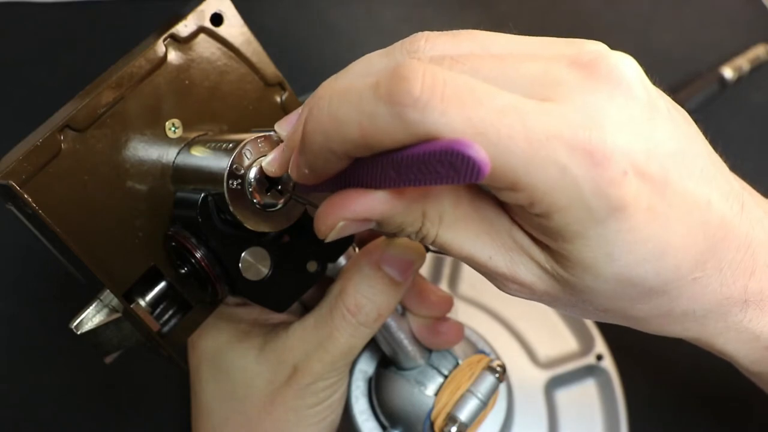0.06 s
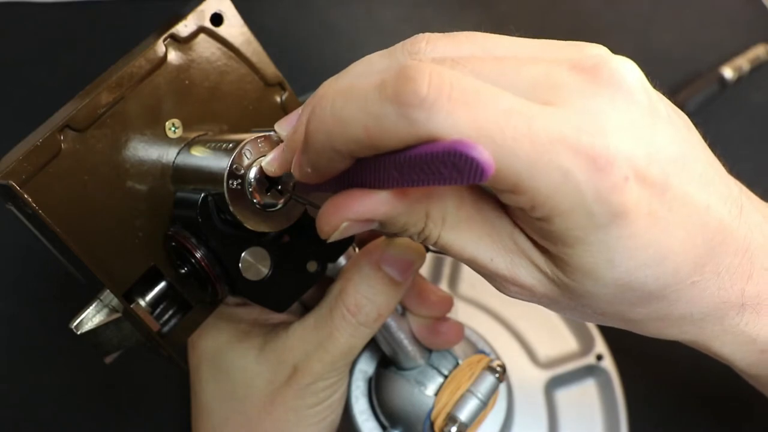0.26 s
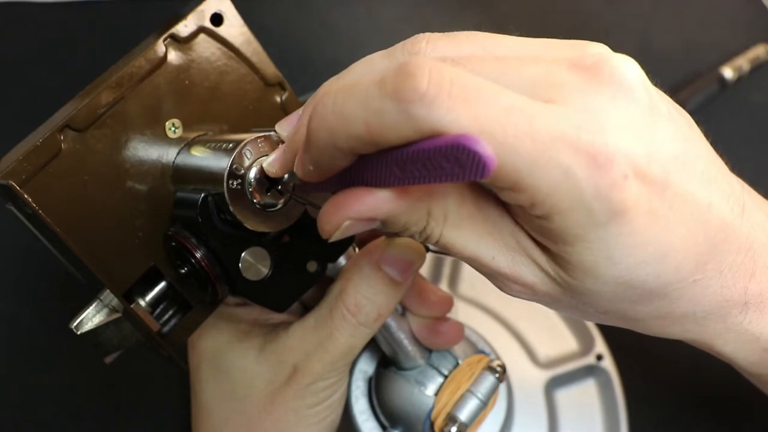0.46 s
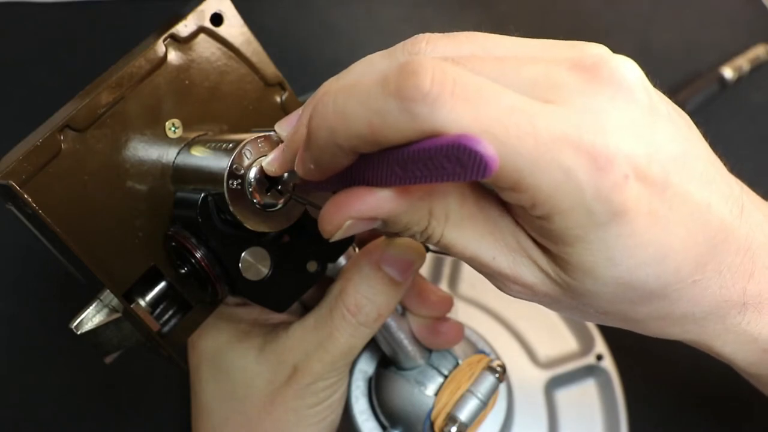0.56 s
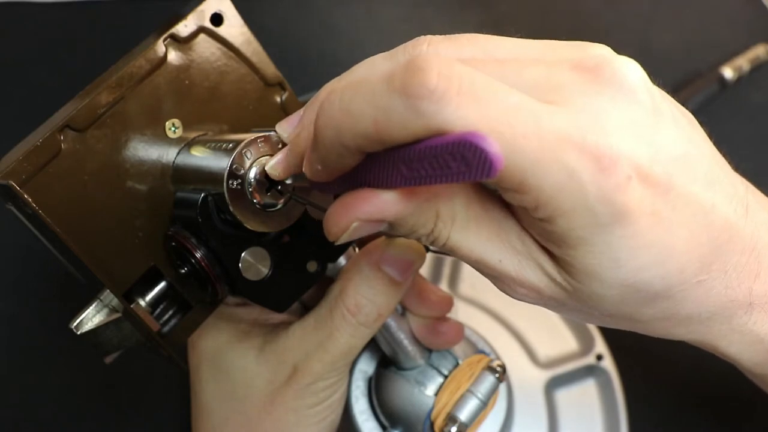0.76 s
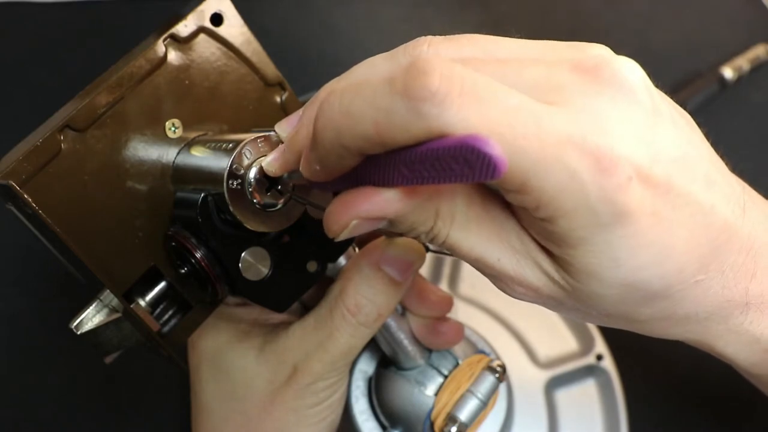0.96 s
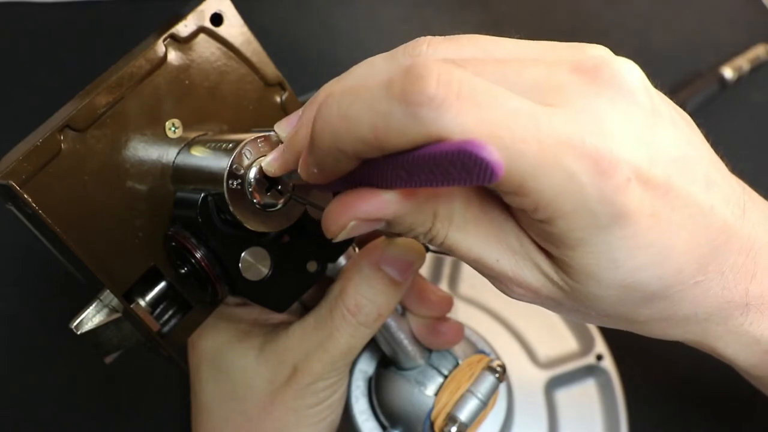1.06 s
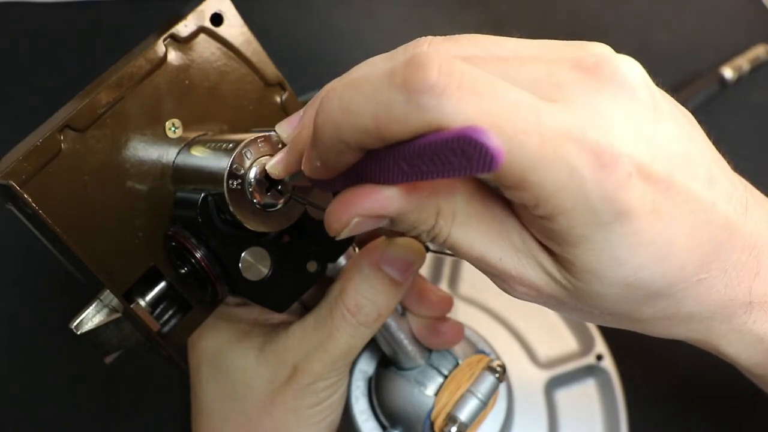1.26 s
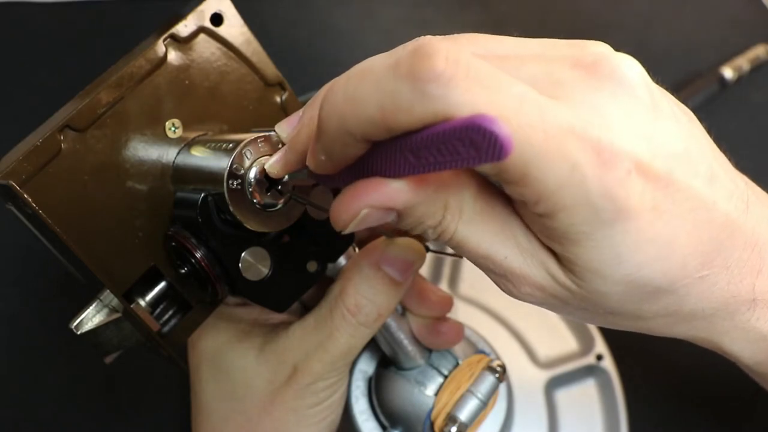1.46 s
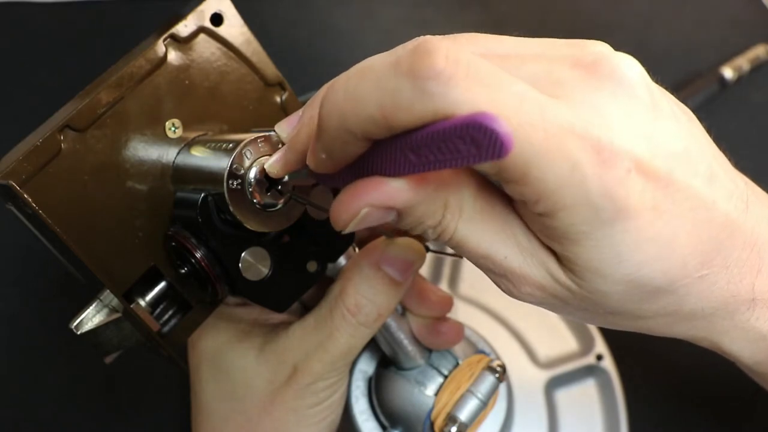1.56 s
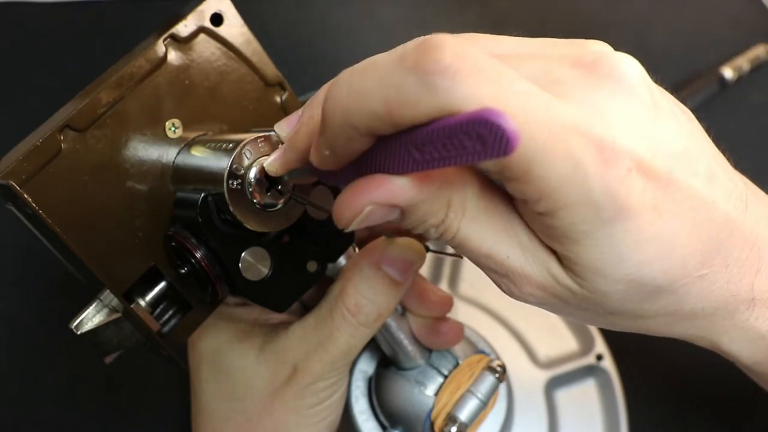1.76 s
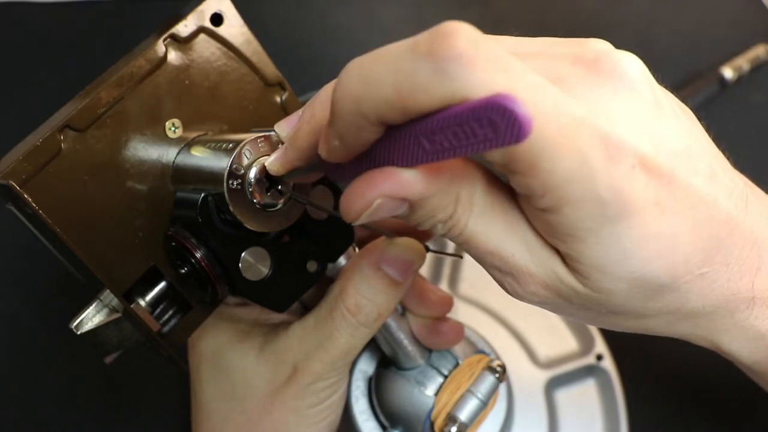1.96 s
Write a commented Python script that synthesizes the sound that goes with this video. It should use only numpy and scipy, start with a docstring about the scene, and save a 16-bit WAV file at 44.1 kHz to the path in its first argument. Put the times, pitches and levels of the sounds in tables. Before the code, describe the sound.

A steel pick works in a lock cylinder, with faint irregular ticks and short scrapes for about a second, then a sharp metallic click and a few last tiny ticks, close microphone, quiet small room.

```python
"""Quiet room noise and mains hum, then a faint rising squeak as a thin steel pick enters a lock held in a vice.
The tip scrapes and ticks over the pins: noise bursts and modal sines, coloured by the point of contact.
The hand bumps softly (low noise) and the lock knocks dully in its grip (two damped sines).
A bound pin lets go with a sharp click of five blows, the hardest ringing the lock. A short room tail follows."""
import sys
import numpy as np
from scipy import signal
from scipy.fft import rfft, irfft, next_fast_len
from scipy.io import wavfile

SR = 44100
rng = np.random.default_rng(int(sys.argv[2]) if len(sys.argv) > 2 else 0)


def unload_audio(sound):
    """Save the sound as a 16-bit wav file, at the path given as the first command line argument."""
    columns = np.transpose(np.atleast_2d(sound))
    # keep every value between -1 and 1, then stretch to whole-number steps
    steps = np.round(np.clip(columns, -1, 1) * 32767)
    wavfile.write(sys.argv[1], SR, steps.astype(np.int16))


N = 88596


def amp(db):
    """Decibels to gain."""
    return 10 ** (np.asarray(db) / 20)


def unit(x):
    """Scale to rms 1."""
    return x / np.sqrt(np.mean(x ** 2) + 1e-20)


def along(points, hz):
    """Interpolate (Hz, value) points on a log-frequency axis."""
    point_hz, value = np.transpose(points)
    return np.interp(np.log(hz + 1), np.log(point_hz + 1), value)


def filtered(x, response):
    """Multiply the spectrum of x by a response of frequency in Hz."""
    size = next_fast_len(len(x) + 8192)
    spectrum = rfft(x, size) * response(np.fft.rfftfreq(size, 1 / SR))
    return irfft(spectrum, size)[:len(x)]


def noise(colour, size):
    """Noise of rms 1 with the given spectral shape."""
    return unit(filtered(rng.standard_normal(size), lambda hz: amp(along(colour, hz))))


def add(track, start_s, sound):
    """Mix a sound into the track, cut at the track's end."""
    part = track[round(start_s * SR):][:len(sound)]
    part += sound[:len(part)]


def swell(t, length_s):
    """Half-sine rise and fall."""
    return abs(np.sin(np.pi * np.clip(t / length_s, 0, 1)))


def background():
    """Steady coloured room noise and hiss, plus sines at the mains lines."""
    # room noise spectrum: freq_hz, density_db (relative, per Hz)
    air_colour = [(3, -57), (15, 1.5), (29, -11.5), (48, -16), (73, -7.5), (100, -2.5), (140, -3.5),
                  (205, 0), (260, -9.5), (400, -6), (730, -10.5), (1120, -12), (2770, -15.5), (4200, -20.5),
                  (8400, -20.5), (14000, -24.5), (16000, -28.5)]
    # mains lines: freq_hz, rms_level_db
    hum_lines = [(59.8, -64.5), (120, -88.5), (179.8, -70), (240, -74.5), (297, -75)]
    air_rms_db = -58.5
    t = np.arange(N) / SR
    hum = np.zeros(N)
    for hz, db in hum_lines:
        hum += amp(db) * np.sqrt(2) * np.sin(2 * np.pi * (hz * t + rng.random()))
    return amp(air_rms_db) * noise(air_colour, N) + hum


def squeak():
    """Stick-slip of the tip: a swelling sine of rising, jittered frequency."""
    start_s, length_s, peak_db = .075, .07, -63.5
    start_hz, rise_hz_per_s, jitter_hz = 1673, 2900, 700
    out, t = np.zeros(N), np.arange(SR // 10) / SR
    pitch_hz = start_hz + rise_hz_per_s * t + jitter_hz * rng.standard_normal(len(t))
    cycles = np.cumsum(pitch_hz) / SR
    add(out, start_s, amp(peak_db) * swell(t, length_s) * np.sin(2 * np.pi * cycles))
    return out


def clatter(t60_s):
    """Dense short-lived modes as noise: an instant crack, a burst and a faint after-ring in the vice."""
    # dense mode spectrum: freq_hz, density_db (relative, per Hz)
    mode_colour = [(40, -70), (200, -32), (420, -6), (950, -7.5), (1350, -1.5), (1750, -6), (2500, 2),
                   (3000, -2), (3700, -5.5), (4400, 0.5), (5500, -8), (7200, 0.5), (8500, -1.5), (10300, 5),
                   (12300, 1), (14300, 4), (15300, -11), (16000, -13)]
    crack_t60_s, crack_db = 0.00056, -7.5
    after_t60_s, after_db = 0.087, -21.5
    t = np.arange(SR // 4) / SR
    burst = amp(-60 * t / t60_s) + amp(crack_db - 60 * t / crack_t60_s)
    after_ring = amp(after_db - 60 * t / after_t60_s)
    return noise(mode_colour, len(t)) * np.hypot(burst, after_ring)


def ring():
    """Distinct modes of lock and pick: damped sines of random phase."""
    # modes of lock and pick: freq_hz
    modes_hz = [641, 1328, 2106, 2424, 2510, 3319, 4610, 6172, 7164, 7400, 7833, 8600, 9518, 10430]
    # the same modes in order: level_db (relative), t60_s
    mode_decays = [(-8.5, 0.16), (-2, 0.038), (-3.5, 0.082), (1, 0.069), (0, 0.048), (-4.5, 0.083),
                   (-1, 0.047), (4.5, 0.044), (7.5, 0.032), (-6, 0.044), (-1.5, .055), (-2, 0.035),
                   (11, 0.021), (-2, 0.05)]
    t = np.arange(SR // 4) / SR
    out = np.zeros(len(t))
    for hz, (db, t60_s) in zip(modes_hz, mode_decays):
        out += amp(db - 60 * t / t60_s) * np.sin(2 * np.pi * (hz * t + rng.random()))
    return out


def favoured(hz, favoured_hz, favour_db):
    """Gain in dB of a point of contact: 0 at its favoured band, -favour_db far from it."""
    width_octaves = .45  # standard deviation
    octaves = np.log2((hz + 1) / favoured_hz)
    return favour_db * (np.exp(-.5 * (octaves / width_octaves) ** 2) - 1)


def contact(ring_db, favoured_hz, favour_db):
    """Light touch of steel: clatter and ring, coloured by the point of contact."""
    touch = clatter(.011) + amp(ring_db) * ring()
    return filtered(touch, lambda hz: amp(favoured(hz, favoured_hz, favour_db)))


def scrapes():
    """Sliding tip: a swell of random tiny slips, each ringing the metal; softer on top than striking."""
    # slides of the tip: start_s, length_s, level_db, favoured_hz, favour_db (over the other bands)
    slides = [(0.164, 0.043, -56.5, 3600, 10), (0.242, 0.013, -57, 7200, 1), (0.269, 0.027, -61, 2780, 15),
              (0.368, 0.023, -57.5, 3600, 11), (0.448, 0.018, -58, 3360, 22), (0.476, 0.023, -57, 3700, 22),
              (0.543, 0.011, -57, 2970, 16), (0.653, 0.025, -55.5, 3500, 5), (0.715, 0.033, -56.5, 3000, 8),
              (0.745, 0.011, -55, 5700, 22), (0.75, 0.013, -54.5, 8500, 2), (.859, 0.011, -59, 3220, 20),
              (0.92, 0.042, -56, 5360, 12), (1.071, 0.01, -61.5, 2600, 26), (1.110, .02, -47, 3200, 11)]
    mean_slips_per_s, ring_db, top_hz = 1800, -21.5, 11100
    out, t = np.zeros(N), np.arange(SR // 10) / SR
    for start_s, length_s, db, hz, favour_db in slides:
        touch = contact(ring_db, hz, favour_db)
        happens = rng.random(len(t)) < mean_slips_per_s / SR
        slips = unit(happens * rng.standard_normal(len(t)))
        slips = slips * np.sqrt(swell(t, length_s))
        add(out, start_s, amp(db) * signal.fftconvolve(slips, touch / np.linalg.norm(touch)))
    return filtered(out, lambda hz: 1 / np.sqrt(1 + (hz / top_hz) ** 8))


def ticks():
    """Tip touching pins: one light contact each."""
    # touches on the pins: start_s, level_db, favoured_hz, favour_db (over the other bands; negative = dip)
    touches = [(.1705, -62, 9000, 14), (.1785, -42, 3030, 17), (.1818, -52, 5600, 2),
               (.190, -51, 8740, -11.5), (.199, -46.5, 9000, -3.5), (.203, -45.5, 9000, -3),
               (.2328, -43.5, 5500, 9), (.246, -62, 7500, 6), (.3825, -41.5, 8700, 9),
               (0.385, -42, 4030, 6), (0.4783, -41, 4500, 14), (.502, -51, 10000, -1),
               (.5425, -41, 2770, 19.5), (0.544, -45, 7400, 15), (.578, -38.5, 2700, 20),
               (.6635, -49.5, 7500, 3), (.673, -34.5, 2760, 22), (.7195, -40, 10500, 7),
               (.7213, -38, 10600, 2), (0.7248, -47, 10500, -2), (.7338, -40, 11000, 12),
               (.7555, -44.5, 6360, 13), (.860, -53, 3500, 13), (.915, -35.5, 2680, 12.5),
               (0.9185, -45, 2700, 6), (.9335, -50, 5770, 14), (.950, -44.5, 5440, 7),
               (1.1126, -50, 2600, 15), (1.123, -51, 7700, 7), (1.2391, -34, 3350, 18),
               (1.876, -51, 10100, -2), (1.8825, -52.5, 10000, -5), (1.9085, -55, 11000, -7),
               (1.971, -48, 10000, 5)]
    out = np.zeros(N)
    for start_s, db, hz, favour_db in touches:
        add(out, start_s, amp(db) * contact(-22, hz, favour_db))
    return out


def handling():
    """Low noise bump of the hand; dull knocks of the lock in its grip as damped sines."""
    # hand bump spectrum: freq_hz, density_db (relative, per Hz)
    bump_colour = [(10, -26), (28, -20), (45, -7), (90, -10), (200, -36), (600, -74)]
    # lock shifting in its grip: start_s, level_db
    knocks = [(.7405, -62.5), (.9215, -52.5), (.9345, -73)]
    # modes of the gripped lock: freq_hz, level_db (relative), t60_s
    grip_modes = [(856, 9.5, 0.055), (624, -0.5, 0.13)]
    bump_s, bump_length_s, bump_db = .25, .11, -63.5
    out, t = np.zeros(N), np.arange(SR // 3) / SR
    add(out, bump_s, amp(bump_db) * swell(t, bump_length_s) * noise(bump_colour, len(t)))
    modes = sum(amp(db - 60 * t / t60_s) * np.sin(2 * np.pi * hz * t) for hz, db, t60_s in grip_modes)
    knock = (1 - np.exp(-t / .002)) * modes  # soft onset, 2 ms time constant
    for start_s, db in knocks:
        add(out, start_s, amp(db) * knock)
    return out


def snap():
    """Bound pin lets go and chatters against its chamber; the hardest blow rings the whole lock."""
    # blows of the freed pin: start_s, level_db
    blows = [(1.1484, -35), (1.1503, -32), (1.1516, -18.5), (1.1531, -28.5), (1.1551, -25.5)]
    t60_s, ring_db = 0.015, -18
    out = np.zeros(N)
    for start_s, db in blows:
        add(out, start_s, amp(db) * clatter(t60_s))
    start_s, db = max(blows, key=lambda blow: blow[1])
    add(out, start_s, amp(db + ring_db) * ring())
    return out


def room(x):
    """Small-room tail: convolution with decaying noise whose treble dies first."""
    # reverberation: freq_hz, t60_s
    decay_times = [(200, 0.35), (2500, 0.19), (8000, 0.11), (15000, 0.1)]
    delay_s = .005
    hz, t, spectrum = signal.stft(rng.standard_normal(SR // 2), SR, nperseg=256)
    decay = amp(-60 * t / along(decay_times, hz)[:, None])
    tail = signal.istft(spectrum * decay, SR, nperseg=256)[1]
    out = np.zeros(N)
    add(out, delay_s, signal.fftconvolve(x, tail / np.linalg.norm(tail)))
    return out


def scene():
    """Lock sounds, their room tail and the background, identical in both channels."""
    room_db = -16
    lock = snap() + ticks() + scrapes() + squeak() + handling()
    mono = lock + amp(room_db) * room(lock) + background()
    return np.array([mono, mono])


def record(dry):
    """Steep low-pass: the recorder's band limit."""
    top_hz = 15750
    return np.array([filtered(channel, lambda hz: 1 / np.sqrt(1 + (hz / top_hz) ** 200)) for channel in dry])


dry = scene()
out = record(dry)
unload_audio(out)
```